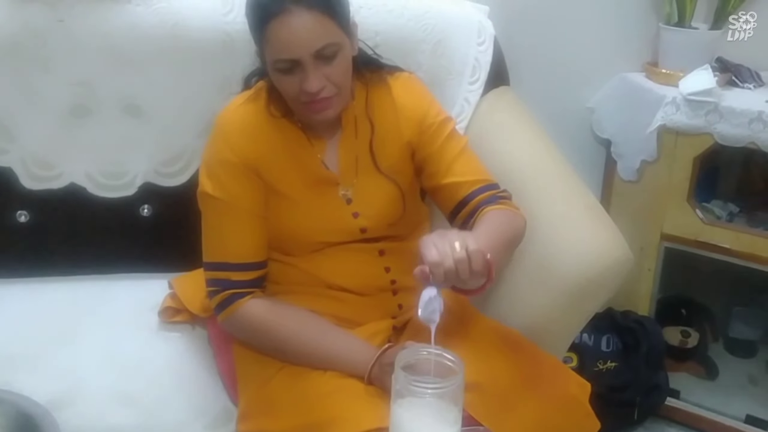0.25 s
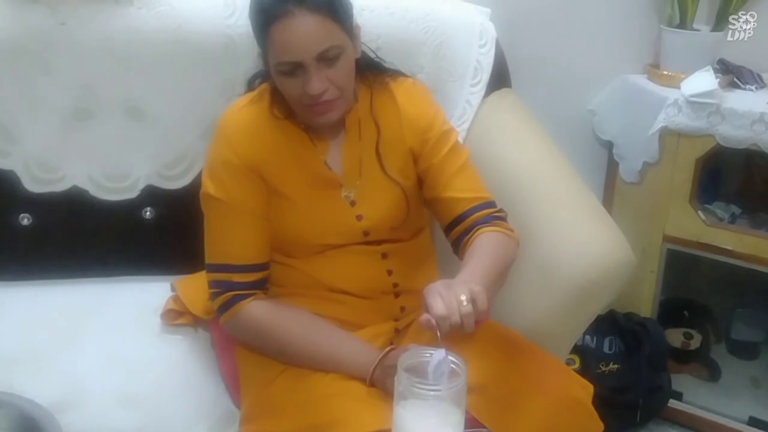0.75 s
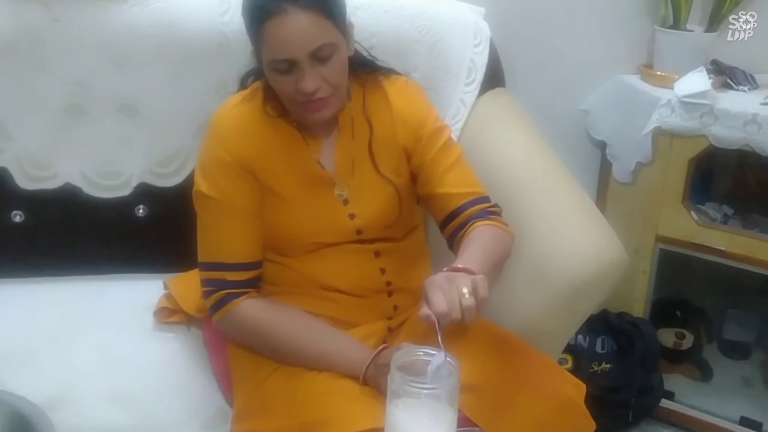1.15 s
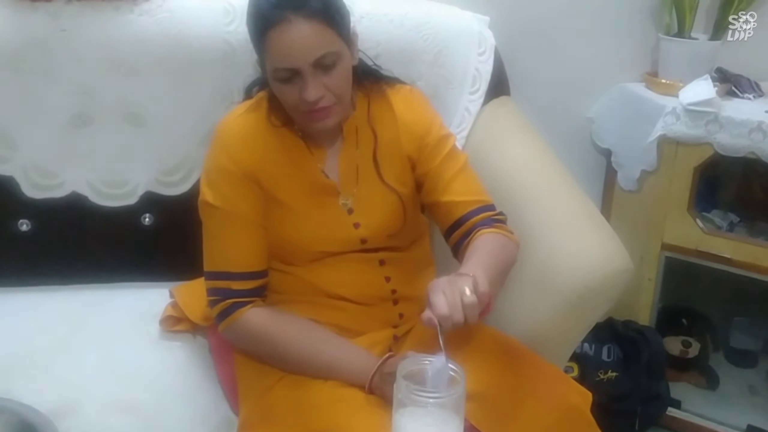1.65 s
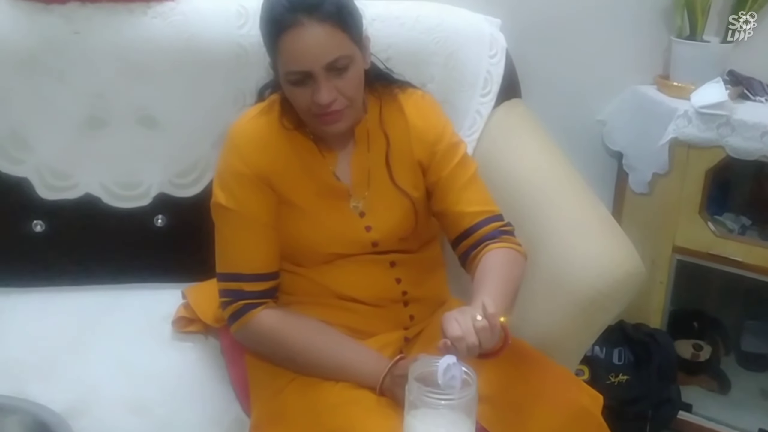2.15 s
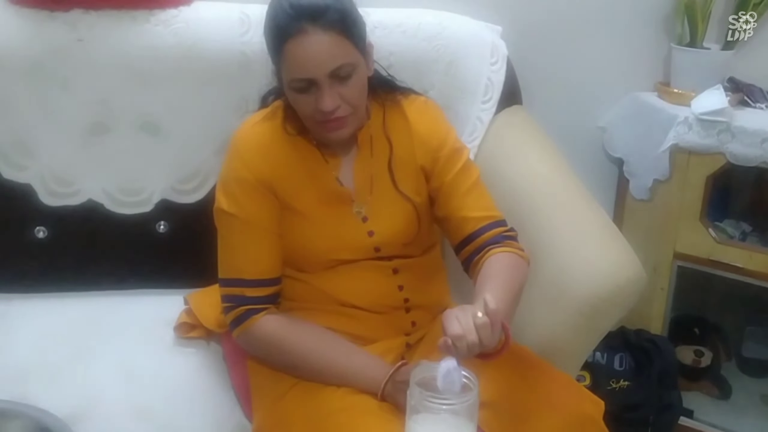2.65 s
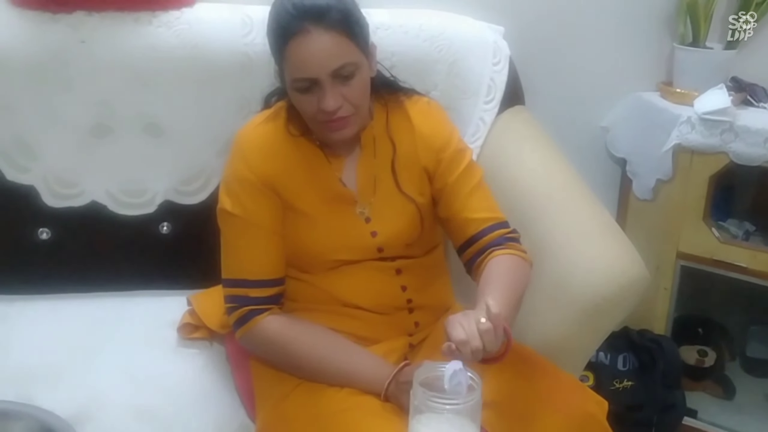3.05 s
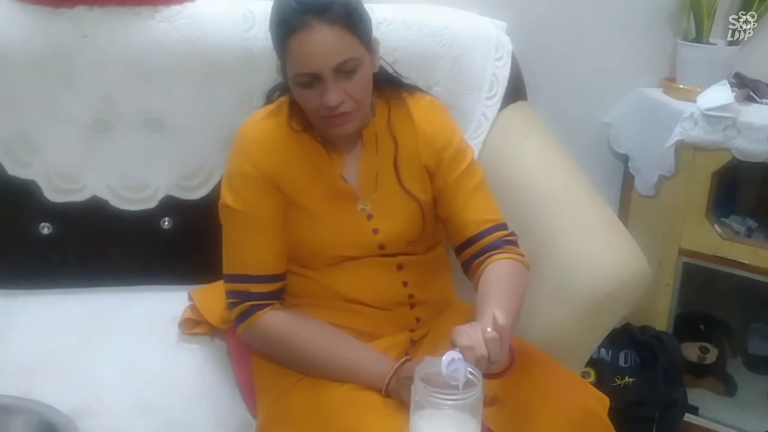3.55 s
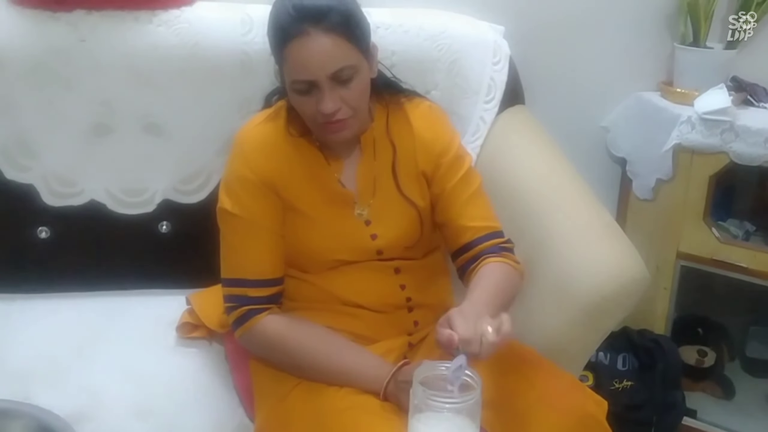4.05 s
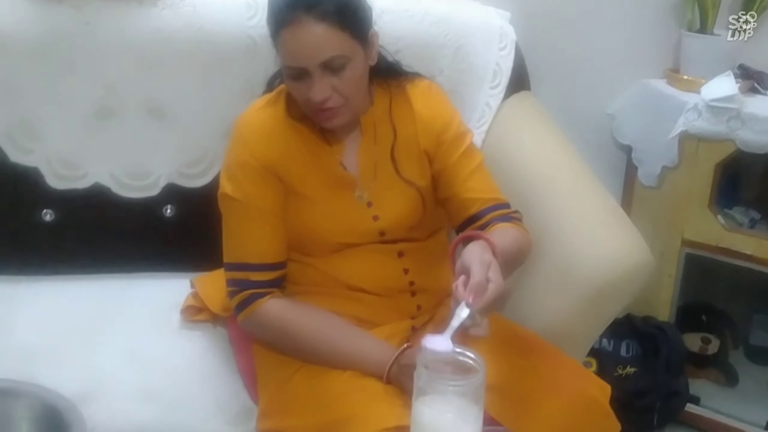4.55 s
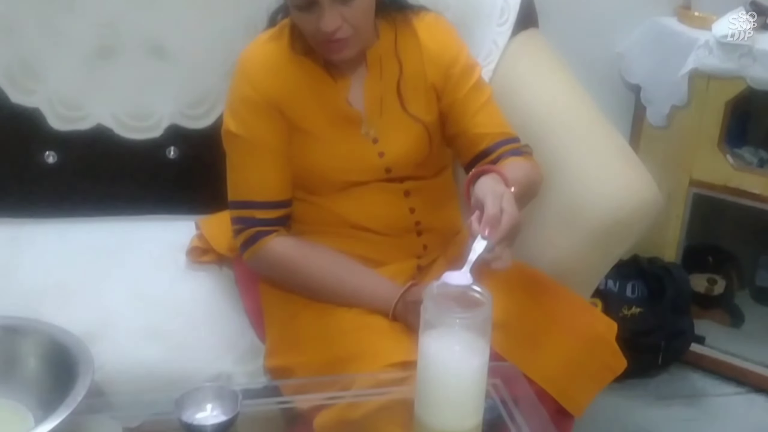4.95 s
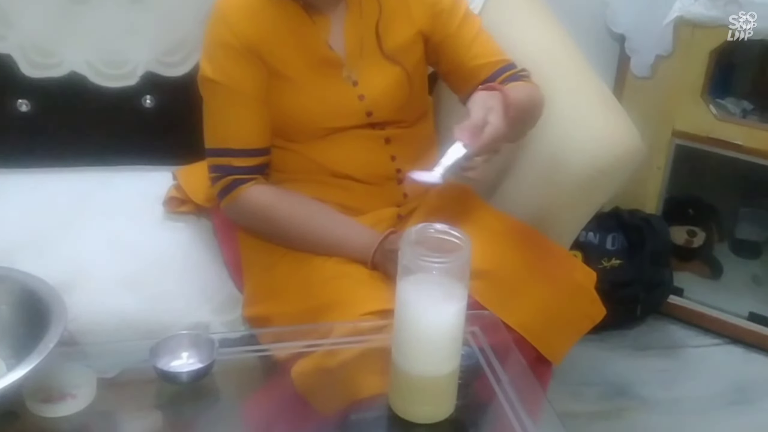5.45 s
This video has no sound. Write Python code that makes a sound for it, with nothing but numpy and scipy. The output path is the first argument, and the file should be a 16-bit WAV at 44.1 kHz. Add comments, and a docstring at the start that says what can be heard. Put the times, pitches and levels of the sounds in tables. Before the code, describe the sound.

A spoon raps sharply on a hand-held jar in two quick bursts, then knocks faintly before the jar is set down indoors.

```python
"""A metal spoon is tapped on a hand-held jar to knock powder off it, in a small hard-walled room.
Each blow sums short damped modes, a dead click and a gritty tick; the spoon itself rings on faintly.
A near wall slaps the hollow clack back, and lingering modes and diffuse echoes form the room's reply.
The spoon knocks again, followed by two fainter knocks, then the jar is set down on a table and nudged:
noise shaped into rubs and base clicks. A faint high hiss swells and fades.
Something turning, perhaps a fan, swishes faintly over a steady floor."""
import sys
import numpy as np
from scipy import signal
from scipy.fft import rfft, irfft, next_fast_len
from scipy.io import wavfile
from scipy.ndimage import uniform_filter1d, map_coordinates

SR = 44100
rng = np.random.default_rng(int(sys.argv[2]) if len(sys.argv) > 2 else 0)


def wav_record(signal):
    """Record a signal, one row per channel, as 16-bit PCM in the file named by sys.argv[1]."""
    frames = np.transpose(np.atleast_2d(signal))
    bounded = np.clip(frames, -1, 1)
    # unit amplitude maps onto the largest positive 16-bit level
    quanta = np.round(bounded * 32767).astype(np.int16)
    wavfile.write(sys.argv[1], SR, quanta)


N = 252119  # length in samples


def amp(db):
    """Level to gain: 20 dB is a factor of ten in amplitude."""
    return 10 ** (np.asarray(db) / 20)


def unit(x):
    """Power normalisation: scale to rms 1."""
    return x / np.sqrt(np.mean(x ** 2) + 1e-20)


def blows(rows, size=530):
    """Energy normalisation: each row gets the energy of 12 ms (size in samples) at rms 1."""
    energy = np.sum(rows ** 2, axis=-1, keepdims=True)
    return rows / np.sqrt(energy / size)


def along(points, hz):
    """Logarithmic frequency scale: interpolate (Hz, value) points along it."""
    f, v = np.transpose(points)
    return np.interp(np.log(hz + 1), np.log(f + 1), v)


def wobble(rate):
    """Random modulation: a smooth curve through rate random knots a second."""
    knots = rng.standard_normal(int(N * rate / SR) + 4)
    return map_coordinates(knots, [np.arange(N) * rate / SR])


def swell(start, length, rise, fall):
    """Exponential envelope: grows to 1 at the start, holds for the length, then dies away (all in s)."""
    t = np.arange(N) / SR - start
    return np.exp(np.minimum(t, 0) / rise - np.maximum(t - length, 0) / fall)


def filtered(x, response):
    """Linear filtering: multiply the spectrum of x by a response of frequency."""
    m = next_fast_len(len(x) + 8192)
    gain = response(np.fft.rfftfreq(m, 1 / SR))
    return irfft(rfft(x, m) * gain, m)[:len(x)]


def butter(band, order=4):
    """Band-pass filtering: steep edges at the two frequencies of the band."""
    return signal.butter(order, band, "bandpass", fs=SR, output="sos")


def noise(colour, size=N):
    """Coloured noise: random samples of rms 1 with a (Hz, dB) spectrum."""
    white = rng.standard_normal(size)
    return unit(filtered(white, lambda hz: amp(along(colour, hz))))


def add(track, s, sound):
    """Superposition: mix a sound into the track at time s."""
    part = track[max(round(s * SR), 0):][:len(sound)]
    part += sound[:len(part)]


# Spectrum of the room rumble and microphone hiss.
# Each row: frequency in Hz, relative level in dB.
FLOOR_COLOUR = [(10, 5), (22, -1), (40, -5), (80, -6), (115, -10.5), (160, -14), (210, -11.5), (320, -19.5),
                (480, -18.5), (1000, -27), (1800, -26), (2600, -30), (3600, -38.5), (5000, -43),
                (7500, -46), (15000, -43)]
FLOOR_DB = -59  # rms level


def background():
    """Stationary noise: steady room rumble and microphone hiss."""
    return amp(FLOOR_DB) * noise(FLOOR_COLOUR)


# Spectrum of the turning swish. Each row: frequency in Hz, relative level in dB.
SWISH_COLOUR = [(400, -15), (1000, -5.5), (2200, 3), (3200, -8), (4100, -5), (5600, -15.5), (7500, -27.5),
                (14000, -29)]
SWISH_FIRST_S, SWISH_PERIOD_S = 0.0, .909  # one swish a turn
SWISH_RISE_S, SWISH_FALL_S = .016, .04
SWISH_DB, SWISH_SCATTER_DB = -61.5, 3.5  # mean and spread of the peak levels


def swishes():
    """Periodic amplitude modulation: noise swells once a turn, a little more than once a second."""
    passes = np.zeros(N)
    for s in np.arange(SWISH_FIRST_S, N / SR, SWISH_PERIOD_S):
        level_db = SWISH_DB - SWISH_SCATTER_DB * rng.normal()
        passes += amp(level_db) * swell(s, 0, SWISH_RISE_S, SWISH_FALL_S)
    return passes * noise(SWISH_COLOUR)


# Registers of a blow, from low to high: thud, hollow, knock, clack, clink and tick.
# Each row: middle frequency in Hz, gain in dB for a blow on the wall, gain in dB for one on the rim.
REGISTERS = [(265, -3, -7), (716, 3, -4.5), (1378, 0.3, 0.07), (2380, -5, 6), (3820, -5, -1),
             (8900, -3, -9)]
CUSHION_DB, CUSHION_HZ = 19.5, 3050  # greatest treble loss of a padded blow, and where it sets in


def blow_colour(strength_db, place, cushion):
    """Excitation spectrum: the wall sounds hollow, the rim clacks, and a padded blow loses its treble."""
    hz, wall_db, rim_db = np.transpose(REGISTERS)
    place_db = wall_db + np.clip(place, 0, 1) * (rim_db - wall_db)
    treble = 1 / (1 + (CUSHION_HZ / hz) ** 12)
    return strength_db + place_db - np.clip(cushion, 0, 1) * CUSHION_DB * treble


# Edges in Hz of the five registers below the tick.
REGISTER_EDGES = [130, 540, 950, 2000, 2900, 5000]
# Modes of the jar and spoon, damped by the hands.
# Each row: mean frequency in Hz, mean level in dB within its register, t60 in seconds.
JAR_MODES = [(192.7, 4, .026), (312, -2.5, 0.041), (520, -9.5, 0.038), (730.5, 5, 0.025),
             (787, -43, 0.0115), (1057, -8.5, 0.013), (1190, -1.5, 0.037), (1498, -4.5, 0.026),
             (1786, 0, 0.023), (1850, -5.5, 0.026), (2350, -21.5, 0.0372), (2407, -4.5, 0.018),
             (2675, -1, 0.012), (3120, -2.5, 0.026), (3440, -28, 0.023), (4020, -0.5, 0.014),
             (4000, 2, 0.016), (4060, 2, 0.016), (4730, -7, 0.016)]
# Spectrum of the contact noise. Each row: frequency in Hz, relative level in dB.
TICK_COLOUR = [(3000, -31), (4900, -8.5), (5600, 3), (6400, -2), (7500, -5.5), (8300, 1.5), (9300, -4),
               (11000, -3), (12000, 0), (13200, -7), (14800, 4.5), (16000, -4)]
# Energy share of toneless click, 0 to 1: first towards the microphone, then all round.
DEAD_SHARES = [.08, .55]
DETUNE, MODE_SCATTER_DB = .006, 7.5  # spread from blow to blow: fraction of the pitch, level
SNAP_T60, GRIT_T60, GRIT_DB = 0.013, 0.03, -10  # s, s, grit relative to snap


def tap(strengths_db):
    """Modal impact: damped modes, a dead click and a gritty tick, towards the microphone and all round."""
    t = np.arange(SR // 12) / SR
    modes = np.zeros((len(strengths_db) - 1, len(t)))
    for k, (hz, db, t60) in enumerate(JAR_MODES):
        # pitch and level of each mode vary randomly from blow to blow
        tone = np.sin(2 * np.pi * hz * (1 + DETUNE * rng.normal()) * t)
        decay = amp(db + MODE_SCATTER_DB * rng.normal() - 60 * t / t60)
        register = np.searchsorted(REGISTER_EDGES, hz) - 1
        modes[register] += (-1) ** k * tone * decay
    bands = [butter(band) for band in zip(REGISTER_EDGES, REGISTER_EDGES[1:])]
    ring = blows(np.array([signal.sosfilt(band, row) for band, row in zip(bands, modes)]))

    # countless dead modes merge into a plain click in each register
    impulse = 1. * (t == 0)
    click = blows(np.array([signal.sosfilt(band, impulse) for band in bands]))

    # the hard edge snaps, then grains of powder crunch under it
    snap = amp(-60 * t / SNAP_T60)
    grit = amp(GRIT_DB - 60 * t / GRIT_T60)
    tick = noise(TICK_COLOUR, size=len(t)) * (snap + grit)

    sent = []
    for dead in DEAD_SHARES:
        body = np.sqrt(1 - dead) * ring + np.sqrt(dead) * click
        sent.append(amp(strengths_db) @ blows(np.vstack([body, tick])))
    return sent


# Decay time of the diffuse echoes. Each row: frequency in Hz, t60 in seconds.
ROOM_T60 = [(150, 0.6), (400, 0.22), (900, 0.35), (2400, .37), (4000, 0.34), (8000, .26), (15000, 0.27)]


def room_tail(build=0.0059):
    """Diffuse reverberation: echoes of energy 1 build up (in s) and die at each frequency's own speed."""
    hz, t, z = signal.stft(rng.standard_normal(SR // 2), SR, nperseg=256)
    decay = amp(-60 * t / along(ROOM_T60, hz)[:, None])
    tail = signal.istft(z * decay, SR, nperseg=256)[1][:SR // 2]
    tail *= 1 - np.exp(-(np.arange(len(tail)) / SR / build) ** 2)
    # the many echoes spread their energy evenly over frequency
    spectrum = rfft(tail)
    power = uniform_filter1d(abs(spectrum) ** 2, size=70)
    even = irfft(spectrum / np.sqrt(power))[:SR * 2 // 5]
    return even / np.linalg.norm(even)


# Colour of the diffuse echoes. Each row: frequency in Hz, relative gain in dB.
ROOM_GAIN = [(80, -4), (160, 0.5), (250, 5.5), (370, 0), (540, 1), (730, -2.5), (930, -2.5), (1400, 7.5),
             (1700, -6), (2200, 2), (2520, -2), (2780, -1), (3000, 3), (4300, -3.5), (7500, 1), (10000, -6)]
# Lingering modes of the room. Each row: frequency in Hz, relative level in dB, t60 in seconds.
ROOM_MODES = [(157, -7.5, 0.096), (368, 7, 0.055), (1048, -1.5, 0.3), (1126, 5, 0.2), (1335, 12.5, 0.2),
              (1450, -7, 0.13), (2345, 0.5, 0.25), (2354, 14, 0.061), (2825, -2.5, .3), (2607, -12, 0.12)]
# Colour of the wall's echo. Each row: frequency in Hz, relative gain in dB.
SLAP_COLOUR = [(300, 6), (1700, -31), (2400, 6.5), (3300, -20), (6000, 0), (15000, -9)]
SLAP_S = 0.018  # delay of the wall's echo
DIFFUSE_DB, SLAP_DB, MODES_DB = -1.0, -8, -52  # added to the tables above
DRIFT = 0.18  # energy share of the tail drawn afresh each time


def room(shared):
    """Room impulse response: a wall slap, lingering modes and a tail that drifts as the jar moves."""
    t = np.arange(len(shared)) / SR
    tail = np.sqrt(1 - DRIFT) * shared + np.sqrt(DRIFT) * room_tail()
    answer = amp(DIFFUSE_DB) * filtered(tail, lambda hz: amp(along(ROOM_GAIN, hz)))
    late = np.maximum(t - SLAP_S, 0)
    for hz, db, t60 in ROOM_MODES:
        answer += amp(MODES_DB + db - 60 * late / t60) * np.sin(2 * np.pi * hz * late)
    # the rim throws mostly its clack towards the wall
    impulse = 1. * (np.arange(len(t)) == round(SLAP_S * SR))
    return answer + amp(SLAP_DB) * filtered(impulse, lambda hz: amp(along(SLAP_COLOUR, hz)))


# The steel spoon's own faint ring between the fingers.
# Each row: mean frequency in Hz, mean relative level in dB, t60 in seconds.
SPOON_MODES = [(1117, -15, 0.86), (2210, -7, 0.51), (2304, -1.5, 0.47), (3040, -13, 0.13),
               (3970, -11.5, .15)]


def spoon(detune=.004, scatter_db=2):
    """Free vibration: lightly damped modes ring on, a little differently with each grip."""
    t = np.arange(SR // 2) / SR
    ring = np.zeros(len(t))
    for hz, db, t60 in SPOON_MODES:
        decay = amp(db + scatter_db * rng.normal() - 60 * t / t60)
        ring += decay * np.sin(2 * np.pi * hz * (1 + detune * rng.normal()) * t)
    return ring * (1 - np.exp(-t / 0.015))  # the ring builds up over about 15 ms


# Blows of spoon against jar, and at 4.71 s the jar meeting the table.
# Each row: start in seconds, strength in dB before the register gains, place from the hollow wall (0)
# to the hard rim (1), cushion from a bare hit (0) to a padded, glancing one (1).
TAPS = [(0.503, -36, .97, 0.1), (0.737, -33.5, .97, 0.07), (0.92, -33.5, 0.52, .1),
        (1.109, -38, 0.09, 0.05), (1.3081, -36.5, 0.28, 0.01), (1.4994, -34, 0.65, 0.1),
        (1.6963, -33.5, 0.76, 0.4), (2.4757, -36.5, 0.97, .6), (2.6845, -37.5, 0.96, .58),
        (2.9082, -52.5, 0.92, 0.79), (4.075, -40, 0.08, 0.01), (4.2052, -57.5, 0, 0.8),
        (4.3116, -62.5, 0.2, .95), (4.7113, -46, 0.32, 0.38)]
TAP_ROOM_DB, SPOON_DB = -0.65, -9  # share of each blow sent into the room, gain of the spoon's ring


def taps():
    """Direct and reverberant sound: every contact is heard straight and convolved with the room."""
    track, shared = np.zeros(N), room_tail()
    for s, strength_db, place, cushion in TAPS:
        strengths_db = blow_colour(strength_db, place, cushion)
        near, spread = tap(strengths_db)
        add(track, s, near)
        add(track, s, amp(TAP_ROOM_DB) * signal.fftconvolve(spread, room(shared)))
        # the spoon is shaken as hard as the jar's hollow body is struck
        add(track, s, amp(SPOON_DB + strengths_db[1]) * spoon())
    return track


# Slides of jar and spoon.
# Each row: middle in seconds, half length (standard deviation) in seconds, direct level in dB.
RUBS = [(4.233, 0.039, -61.5), (4.503, 0.088, -69), (4.552, 0.02, -63), (4.873, 0.051, -73.5),
        (4.973, 0.033, -62), (5.093, 0.068, -67), (5.219, 0.023, -56), (5.268, 0.021, -56)]
# Spectrum of the slides. Each row: frequency in Hz, relative level in dB.
RUB_COLOUR = [(150, -16), (350, -15), (600, -6.5), (1120, 2), (1330, -9), (1550, 1.5), (2000, 1),
              (2650, 1.5), (2900, -2), (3200, -15.5), (5000, -23), (9000, -66)]


def rubs(grain_db=3.5, echo_db=-3):
    """Stick-slip friction: grainy noise in short strokes and its echo, while the jar is put down."""
    t = np.arange(N) / SR
    strokes = sum(amp(db) * np.exp(-((t - s) / half) ** 2 / 2) for s, half, db in RUBS)
    rub = strokes * unit(noise(RUB_COLOUR) * amp(grain_db * wobble(300)))
    echo = signal.fftconvolve(rub, room(room_tail()))[:N]
    return rub + amp(echo_db) * echo


# Faint high hiss that swells and fades; the row at 4.539 s is a short faint puff on the turning swish.
# Each row: start in seconds, length in seconds, level in dB before the common trim.
HISS_SWELLS = [(4.225, .04, -67), (4.466, .82, -69), (4.539, 0.014, -72), (5.606, .11, -73)]
# Spectrum of the hiss. Each row: frequency in Hz, relative level in dB.
HISS_COLOUR = [(2000, 10), (4200, 8.5), (5600, 1.5), (7000, -3.5), (8200, 7.5), (9500, -11), (15000, 5.5)]
HISS_RISE_S, HISS_FALL_S = 0.033, 0.046


def hiss_swells(trim_db=-1, flutter_db=2.0):
    """Amplitude modulation: fluttering high noise swells and fades."""
    swells = sum(amp(db) * swell(s, length, HISS_RISE_S, HISS_FALL_S) for s, length, db in HISS_SWELLS)
    hiss = unit(noise(HISS_COLOUR) * amp(flutter_db * wobble(360)))
    return amp(trim_db) * swells * hiss


# The jar's base clicking on the table, close and dry. Each row: start in seconds, level in dB.
BASE_CLICKS = [(4.908, -63.5), (4.9443, -48.5)]
# Spectrum of the base clicks. Each row: frequency in Hz, relative level in dB.
BASE_COLOUR = [(120, -16), (400, 2), (750, 1.5), (1200, 8), (1700, -27), (2300, 16), (2800, -16),
               (3200, -3), (3700, -17), (9000, -36)]
BASE_TOP_HZ = 3400  # the broad base gives little treble


def base_clicks(t60=0.013):
    """Heavily damped impact: the base meets the table with a short dead click."""
    track, t = np.zeros(N), np.arange(SR // 20) / SR
    dull = signal.butter(8, BASE_TOP_HZ, fs=SR, output="sos")
    for s, db in BASE_CLICKS:
        burst = noise(BASE_COLOUR, size=len(t)) * amp(-60 * t / t60)
        add(track, s, amp(db) * blows(signal.sosfilt(dull, burst)))
    return track


def scene():
    """Superposition: all sources add at one microphone."""
    mix = taps() + base_clicks() + rubs() + hiss_swells() + swishes() + background()
    return mix[None]


TOP_HZ = 15800  # band limit


def record(dry):
    """Band limiting: the recorder keeps nothing above its top frequency."""
    return np.array([filtered(channel, lambda hz: hz < TOP_HZ) for channel in dry])


dry = scene()
out = record(dry)
wav_record(out)
```